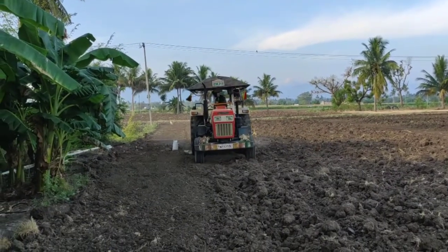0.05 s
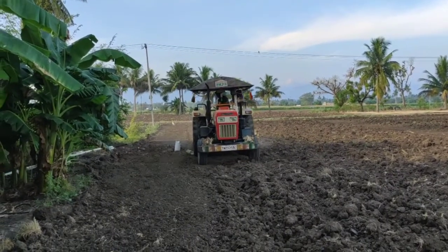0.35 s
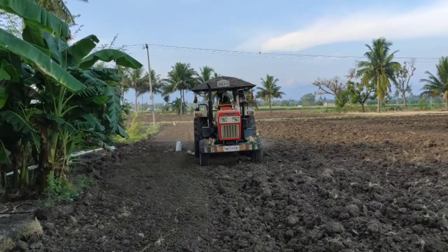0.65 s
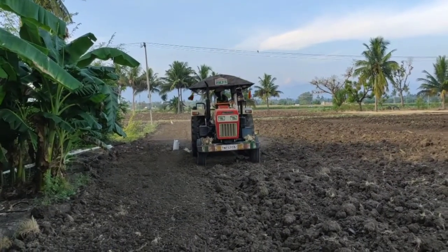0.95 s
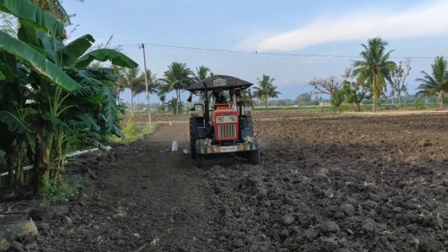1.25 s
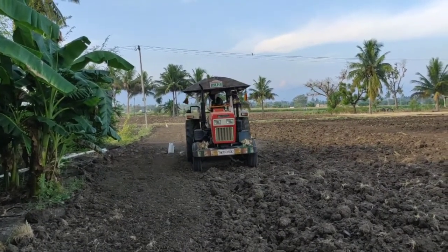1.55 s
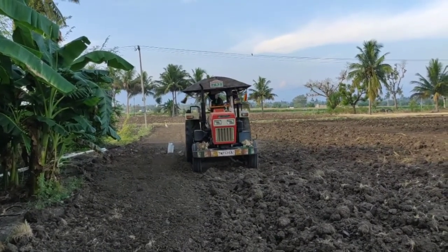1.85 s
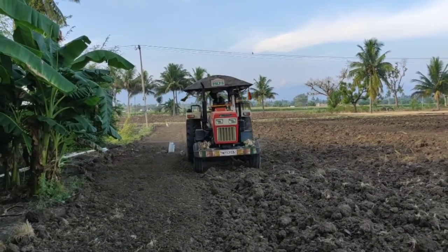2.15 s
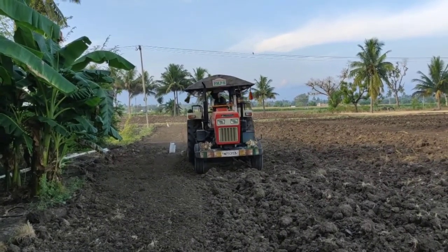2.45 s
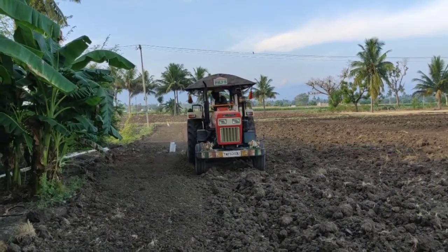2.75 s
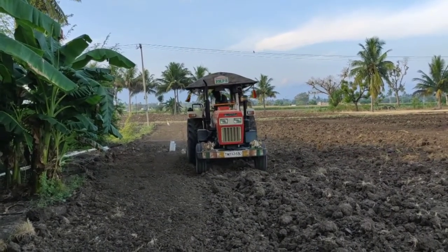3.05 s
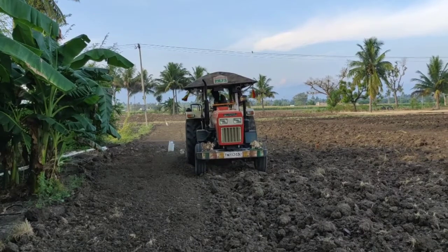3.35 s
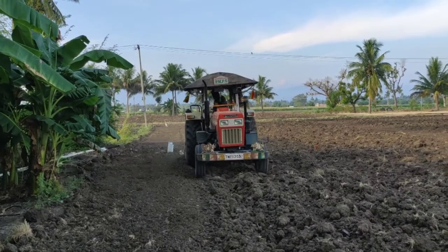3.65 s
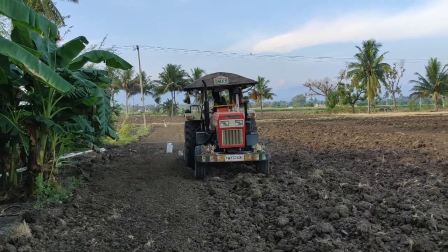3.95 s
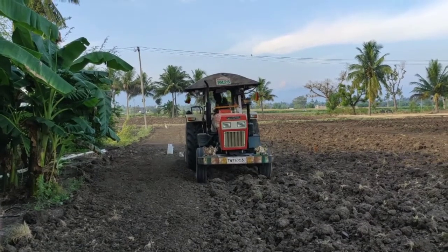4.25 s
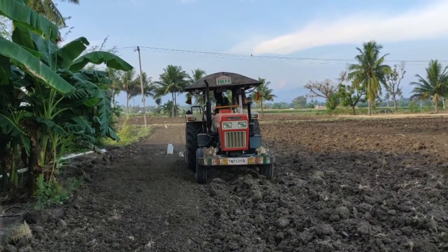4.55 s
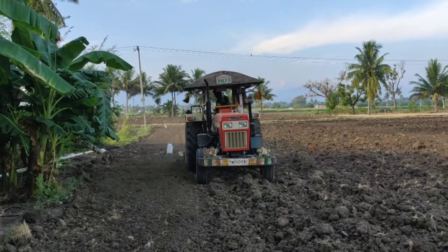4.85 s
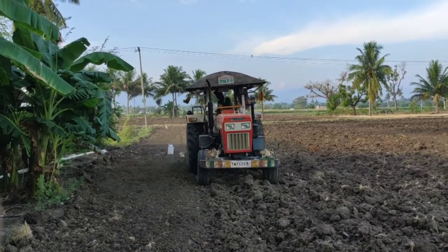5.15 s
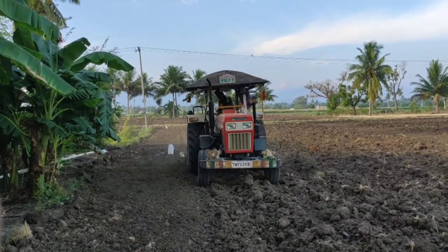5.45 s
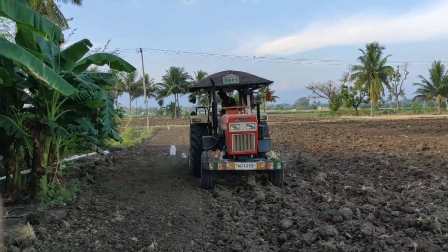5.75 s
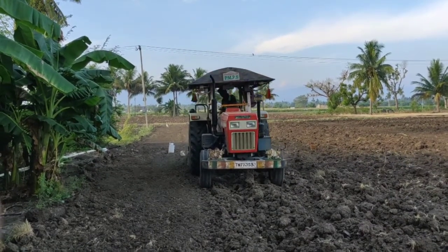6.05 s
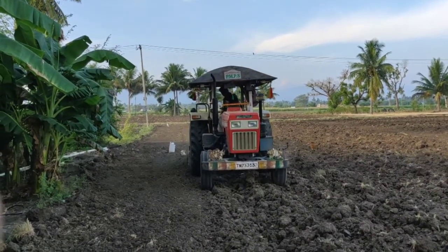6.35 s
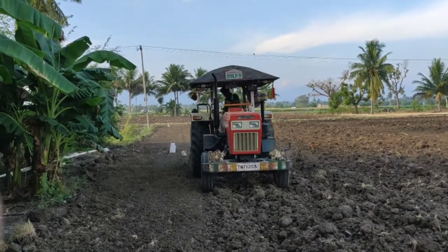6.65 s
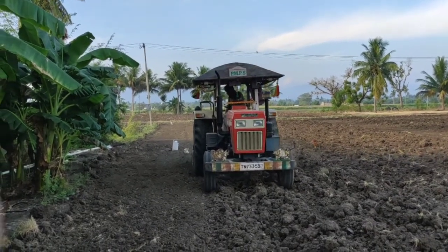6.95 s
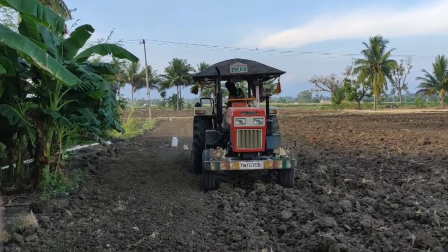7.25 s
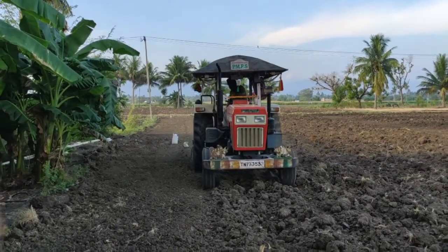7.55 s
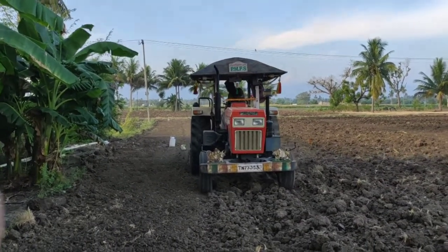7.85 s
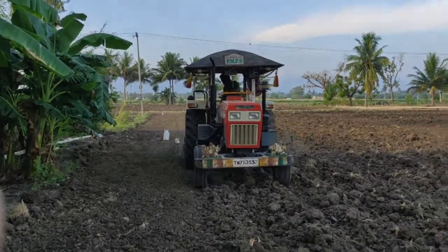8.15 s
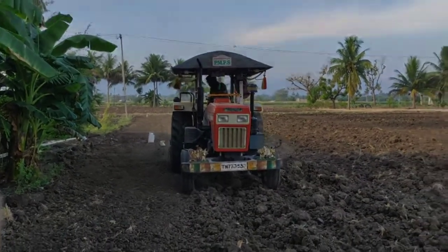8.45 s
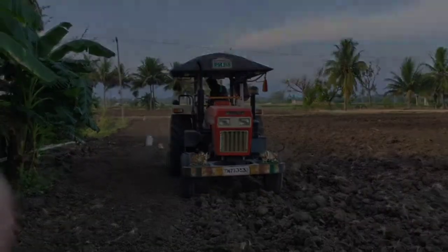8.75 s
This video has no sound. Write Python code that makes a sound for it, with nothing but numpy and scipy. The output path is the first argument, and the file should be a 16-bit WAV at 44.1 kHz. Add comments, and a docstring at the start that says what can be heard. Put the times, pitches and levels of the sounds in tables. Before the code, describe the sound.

Straight ahead in an open field, a tractor engine chugs and clatters at an even pace, with thin ticks and a few small clanks standing out. Tiller blades rumble through the earth and spray hissing crumbs, while gears drone and a fan whines softly. The machine creeps nearer and gets louder, its low exhaust tone shifting, until everything fades away at the close.

```python
"""Tractor tilling a field

A three-cylinder diesel pulls a rotavator toward the listener, growing louder until a closing fade.
Each firing gives an exhaust thud and a bright knock that rings on in the block; one injector ticks
harder than the rest. Underneath run the gear drone, the fan whine and the rumble and hiss of soil.
An echo off the open field hollows out one exhaust order (a harmonic of the firing rate) after another."""
import sys
import numpy as np
from scipy import signal
from scipy.fft import rfft, irfft
from scipy.io import wavfile
from scipy.ndimage import uniform_filter1d

SR = 44100
rng = np.random.default_rng(int(sys.argv[2]) if len(sys.argv) > 2 else 0)


def wav_out(sig):
    """Save sig, one row per channel (or a flat mono array), as 16-bit PCM at SR to the path in sys.argv[1]."""
    wavfile.write(sys.argv[1], SR, np.round(np.clip(np.atleast_2d(sig).T, -1, 1) * 32767).astype(np.int16))


N = 388958
TIME = np.arange(N) / SR

# each cylinder's voice, in firing order: knock_db, pump_hiss_db (against its knock)
CYLINDER_VOICES = [(1.3, -6), (-0.3, -9), (-0.6, -14)]


def gain_of(db):
    """Decibels to amplitude."""
    return 10 ** (np.asarray(db) / 20)


def unit_rms(x):
    """Scales to rms 1."""
    return x / np.sqrt(np.mean(x ** 2) + 1e-20)


def coloured(x, spectrum):
    """Shapes x with an EQ curve of (freq_hz, level_db) rows, at rms 1."""
    hz, db = np.transpose(spectrum)
    bins = np.fft.rfftfreq(N, 1 / SR)
    eq = gain_of(np.interp(np.log(bins + 1), np.log(hz), db))
    return unit_rms(irfft(rfft(x) * eq, N))


def noise(spectrum):
    """Steady coloured noise, at rms 1."""
    return coloured(rng.standard_normal(N), spectrum)


def wander(hz):
    """A random drift no faster than about hz, at rms 1."""
    steps = 4096
    bins = np.fft.rfftfreq(steps, TIME[-1] / steps)
    slow = irfft(rfft(rng.standard_normal(steps)) / (1 + (bins / hz) ** 4))
    return unit_rms(np.interp(TIME, np.linspace(0, TIME[-1], steps), slow))


def hump(peak_s, half_width_s):
    """A smooth rise to 1 and back around a moment."""
    return 1 / (1 + ((TIME - peak_s) / half_width_s) ** 2)


def bursts(times, sizes_db, rise_s, t60_s):
    """Envelope of hits that swell up to their moment and die away; their powers add."""
    lead = SR // 50
    t = np.arange(-lead, SR // 5) / SR
    power = np.where(t < 0, np.exp(-(t / rise_s) ** 2), gain_of(-60 * abs(t) / t60_s) ** 2)
    at = np.clip(np.round(times * SR).astype(int), 0, N + lead)
    hits = np.bincount(at, gain_of(sizes_db) ** 2, N + lead)
    return np.sqrt(abs(signal.fftconvolve(hits, power)[lead:lead + N]))


def exhaust(beat, near_db, drone_db, lag=0.1, skew=0.42):
    """One low thud per firing, a push then a suck; its orders grow with nearness and sink in turn."""
    # body of the thud at the starting distance, without the echo: order, level_db, distance_power
    thud_orders = [(1, -39.5, 1.94), (2, -28, 1.11), (3, -32.5, 1), (4, -37, 0.088), (5, -51, 1.1)]
    # weaker, rougher orders: order, level_db (against the drone)
    overtones = [(6, -23.5), (7, -25), (8, -35), (10, -18.5), (11, -27), (13, -27)]
    # spots on the way where the echo cancels an order: order, centre_s, half_width_s, dip_db
    hollows = [(2, 0.38, 1.77, -22.5), (3, 2.58, 1.45, -12.5), (4, 5.1, 0.79, -25), (5, 4.5, 0.74, -11),
               (10, 4.6, .5, -8)]

    def order(k, level_db, flutter):
        dip_db = sum(db * hump(at, width) for j, at, width, db in hollows if j == k)
        tone = np.sqrt(2) * np.cos(2 * np.pi * (k * (beat - lag) + skew))
        return gain_of(level_db + dip_db) * (1 + flutter * wander(22)) * tone
    body = sum(order(k, db + power * near_db, flutter=0.047) for k, db, power in thud_orders)
    return body + sum(order(k, db + drone_db, flutter=0.42) for k, db in overtones)


def clatter(firings, cylinder, knock_db=-3.5, block_db=-3.0, pump_lead_s=0.0028, ring_delay_s=0.0036):
    """The fuel pump hisses, the charge knocks, and the block rings on into the next firing."""
    # bright crack of combustion: freq_hz, level_db
    knock_eq = [(300, -10), (1500, -16.5), (2150, -27), (2550, 2), (3050, -19), (4400, -1.5), (5200, -19),
                (6300, -16), (7400, -2), (8400, 0.5), (9500, 4), (10700, 1), (12200, -5.5), (13800, -13)]
    # fuller ring of the engine block: freq_hz, level_db
    block_eq = [(300, -19.5), (700, -0.5), (1100, -2.5), (1550, -8.5), (2150, -7.5), (2480, -5.5),
                (3200, -3), (4050, -1), (5100, -6), (6600, -0.5), (8200, 2.5), (10200, -4), (12200, -7),
                (13800, -22)]
    strength_db, pump_db = np.transpose(CYLINDER_VOICES)[:, cylinder]
    firing_scatter, knock_scatter_db = rng.standard_normal((len(firings), 2)).T
    strength_db = strength_db + 1.15 * firing_scatter
    knock = bursts(firings, strength_db + knock_scatter_db, rise_s=.0012, t60_s=.033)
    pump = bursts(firings - pump_lead_s, strength_db + pump_db, rise_s=.001, t60_s=.0054)
    ring = bursts(firings + ring_delay_s, .5 * strength_db, rise_s=.0042, t60_s=.09)
    # each cylinder repeats part of its own grain at every firing
    starts = firings - 2 * pump_lead_s
    latest = np.maximum(np.searchsorted(starts, TIME) - 1, 0)
    samples_since = np.round((TIME - starts[latest]) * SR).astype(int)

    def grain(spectrum, alike=.2):
        repeated = rng.standard_normal((len(CYLINDER_VOICES), SR))[cylinder[latest], samples_since]
        fresh = rng.standard_normal(N)
        return coloured(np.sqrt(alike) * repeated + np.sqrt(1 - alike) * fresh, spectrum)
    crack = gain_of(knock_db) * unit_rms(np.hypot(knock, pump)) * grain(knock_eq)
    return crack + gain_of(block_db) * unit_rms(ring) * grain(block_eq)


def mottled(x, patchy_db=1.9):
    """Gives every knock its own colour: random patches up to a firing long, a few hundred Hz wide."""
    frames = signal.stft(x, nperseg=256, noverlap=192)[2]
    patches = uniform_filter1d(rng.standard_normal(frames.shape), size=3, axis=0)
    patches = unit_rms(uniform_filter1d(patches, size=12, axis=1))
    dappled = signal.istft(frames * gain_of(patchy_db * patches), nperseg=256, noverlap=192)[1][:N]
    return np.std(x) * unit_rms(dappled)


def castings(firings, clatter_db, usual_db=-6, dull_hz=5200):
    """Each knock rings the metal with a new force and mix of modes; the hardest clank in the low ones."""
    # modes of the block and its covers: pitch_hz, level_db, t60_s
    modes = [(1205, -10, .08), (1410, -14, .06), (1720, -16, .06), (1910, -14, .06), (2390, -4, .05),
             (2505, 0, .05), (2630, -1, .045), (2780, -4, .04), (3640, -6, .035), (4060, -4, .04),
             (4460, -4, .03), (5530, -9, .03), (7000, -3, .025), (8300, -3, .03), (9450, 0, .025),
             (11500, -5, .02)]
    # the hardest knocks: start_s, force_db
    clanks = [(.973, -35), (2.43, -28.5), (3.334, -30), (3.803, -30), (5.199, -30), (5.697, -26.5),
              (6.444, -27), (6.601, -31), (7.947, -27.5)]
    clank_s, clank_db = np.transpose(clanks)
    at = np.clip(np.round(np.r_[firings, clank_s] * SR).astype(int), 0, N - 1)
    usual = gain_of(np.interp(firings, TIME, clatter_db) + usual_db + rng.standard_normal(len(firings)))
    t, metal = np.arange(SR // 10) / SR, np.zeros(N)
    for hz, db, t60 in modes:
        hard = gain_of(clank_db) / (1 + (hz / dull_hz) ** 4)
        force = np.r_[usual * rng.standard_normal(len(firings)), hard * rng.choice([-1, 1], len(hard))]
        ring = gain_of(db - 60 * t / t60) * np.sin(2 * np.pi * hz * t)
        metal += signal.oaconvolve(np.bincount(at, force, N), ring)[:N]
    return metal


def injector(firings, clatter_db, usual_db=6.8, spread_db=2.2):
    """One injector snaps shut with a short, high tick once per engine cycle."""
    # the hardest ticks: start_s, level_db
    accents = [(0.041, -22), (.133, -20), (1.56, -16.5), (1.906, -18), (2.37, -20), (4.889, -19),
               (5.916, -20), (6.196, -16), (6.477, -16), (6.57, -17), (6.761, -18), (7.602, -22),
               (8.164, -17), (8.352, -15)]
    # thin, glassy snap of the injector: freq_hz, level_db
    tick_eq = [(1000, -34), (5000, -34), (6800, -4), (7700, -3), (8500, -2), (9500, 3.5), (10300, -1.5),
               (11200, -16), (13800, -64)]
    accent_s, accent_db = np.transpose(accents)
    soft_db = np.interp(firings, TIME, clatter_db) + usual_db
    soft_db += spread_db * rng.standard_normal(len(firings))
    soft = abs(firings[:, None] - accent_s).min(1) > .01  # an accent replaces a tick within 10 ms
    times, sizes_db = np.r_[firings[soft], accent_s], np.r_[soft_db[soft], accent_db]
    return bursts(times, sizes_db, rise_s=.0008, t60_s=.013) * noise(tick_eq)


def gears(beat, level_db=-2, throb=0.018, lag=0.17, patchy_db=1.06):
    """Gearbox and tiller drive drone in their casings, loaded anew by each firing."""
    # low-mid drone of the casings: freq_hz, level_db
    casing_eq = [(15, -22), (140, 0), (240, -1), (330, -0.5), (460, -3), (550, 3.5), (710, 7), (830, 2),
                 (950, -10), (1040, -0.5), (1380, -1.5), (1600, -6.5), (3500, -15)]
    load = 1 + throb * np.cos(2 * np.pi * (beat - lag))
    return gain_of(level_db + patchy_db * wander(22)) * load * noise(casing_eq)


def fan(beat, blades_per_firing=19 / 3, flutter=0.45, slip=0.046, swell_db=3):
    """Blade-pass whine, tied to the crank and fluttering in its own draught; each tone swells once."""
    # blade-pass tones: harmonic, level_db (against the drone, before the swell), peak_s
    blade_tones = [(1, -17, 3.2), (2, -18, 6.3), (3, -13.5, 4.7), (4, -21, 6), (5, -20, 3.2)]
    angle = 2 * np.pi * (blades_per_firing * beat + slip * wander(3.7))
    whine = np.zeros(N)
    for k, db, peak_s in blade_tones:
        level = gain_of(db + swell_db * hump(peak_s, half_width_s=1.2)) * (1 + flutter * wander(23.5))
        whine += level * np.cos(k * angle + 2 * np.pi * rng.random())
    return np.sqrt(2) * whine


def tiller(beat, strikes_per_firing=2.65, hum_db=-13, rumble_db=-7):
    """The rotor, geared to the crank, chops the ground: a low hum of blade strikes in a rumble."""
    # deep rumble of turned earth: freq_hz, level_db
    earth_eq = [(15, -6), (46, 2), (62, 3), (82, -4.5), (105, -1), (135, -19), (250, -28), (1000, -68)]
    strikes = np.sqrt(2) * np.cos(2 * np.pi * strikes_per_firing * beat) * (1 + .5 * wander(3.1))
    return gain_of(hum_db) * strikes + gain_of(rumble_db) * noise(earth_eq)


def soil(level_db=-7.5, crumbs_per_s=6000, spread_db=2.6):
    """The blades throw a dense spray of crumbs against the hood."""
    # hiss of crumbs on the hood: freq_hz, level_db
    hood_eq = [(300, 7.5), (1500, -1.5), (1900, 12), (2200, 5.5), (2500, 12.5), (3000, 9.5), (4200, 8),
               (5100, 4), (7700, 4.5), (10500, -0.5), (13800, -23.5)]
    size = gain_of(spread_db * np.minimum(rng.exponential(1, N), 5)) * rng.standard_normal(N)
    lands = rng.random(N) < crumbs_per_s / SR
    return gain_of(level_db) * coloured(size * lands, hood_eq)


def scene():
    """The crank sets the rhythm and distance the level; dead ahead, the tractor is alike in both ears."""
    # engine speed, held by the governor: time_s, firing_rate_hz
    engine_speed = [(0.0, 32.23), (0.72, 32.08), (1.52, 32.247), (3.23, 32.066), (4.8, 32.294),
                    (6.74, 31.898), (7.59, 32.132), (8.31, 31.838), (8.82, 32.391)]
    firing_hz = np.interp(TIME, *np.transpose(engine_speed))
    beat = -1.276 + np.cumsum(firing_hz) / SR  # engine phase, one unit per firing
    count = np.arange(np.ceil(beat[0]), beat[-1]).astype(int)
    firings, cylinder = np.interp(count, beat, TIME), count % len(CYLINDER_VOICES)
    start_m, approach_m_per_s = 13.2, 0.69
    near_db = 20 * np.log10(start_m / (start_m - approach_m_per_s * TIME))
    clatter_db, drone_db = -33.5 + near_db, -37 + 0.82 * near_db
    bright = gain_of(clatter_db) * (mottled(clatter(firings, cylinder)) + soil())
    metal = castings(firings, clatter_db) + injector(firings[cylinder == 0], clatter_db)
    drone = gain_of(drone_db) * (gears(beat) + fan(beat) + tiller(beat))
    thuds = exhaust(beat, near_db, drone_db)
    return np.array([bright + metal + drone + thuds] * 2)


def record(dry):
    """A straight-line closing fade that ends short of silence, then a steep cut of the top treble."""
    fade_start_s, fade_s, cutoff_hz = 7.462, 1.62, 13950
    faded = dry * np.clip(1 - (TIME - fade_start_s) / fade_s, 0, 1)
    lowpass = signal.firwin(361, cutoff_hz, window=("kaiser", 9), fs=SR)
    return signal.oaconvolve(faded, lowpass[None], "same")


dry = scene()
out = record(dry)
wav_out(out)
```